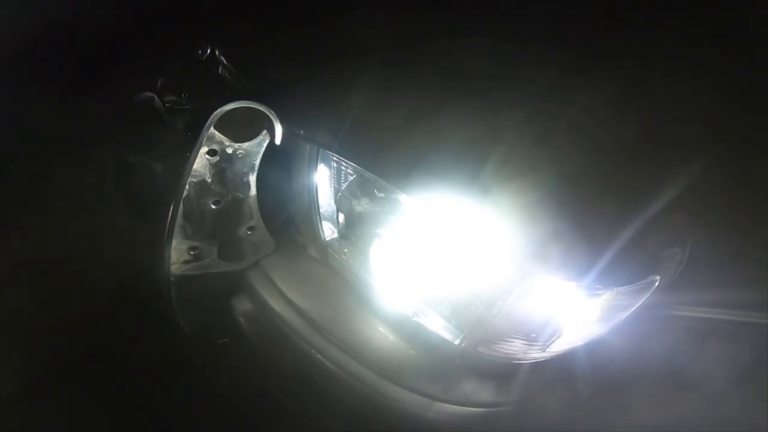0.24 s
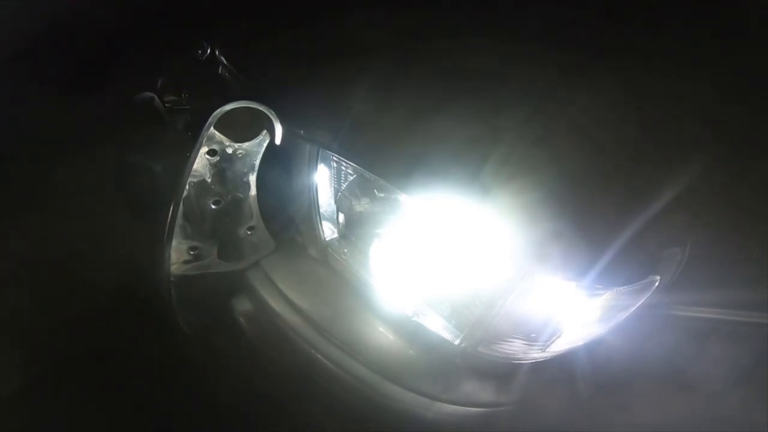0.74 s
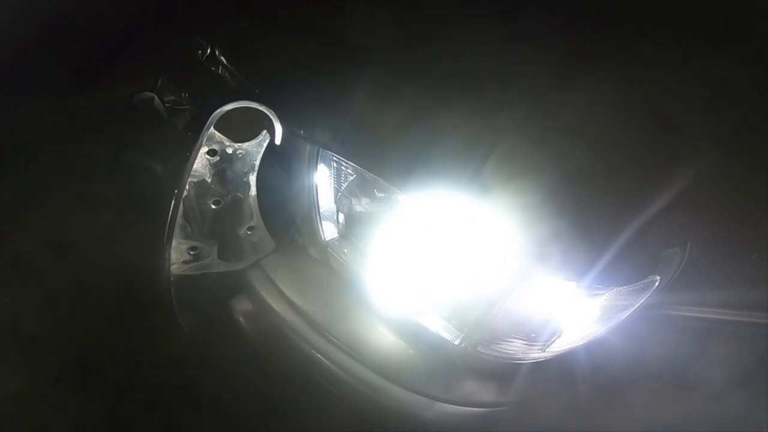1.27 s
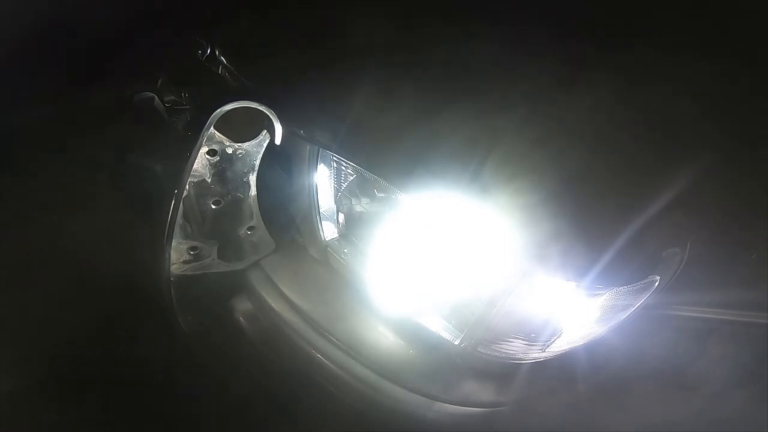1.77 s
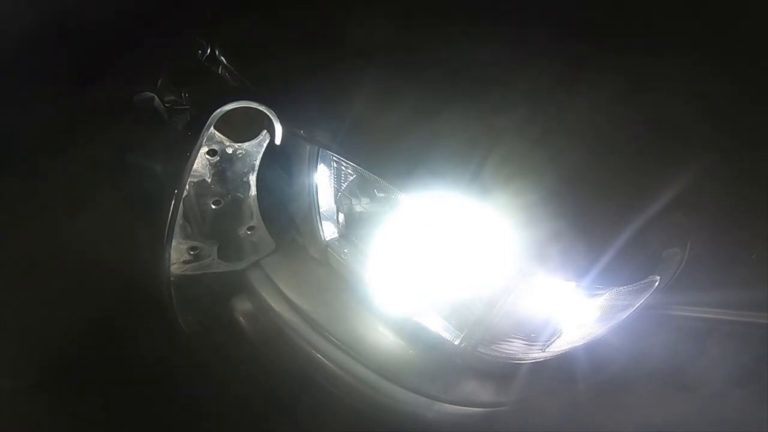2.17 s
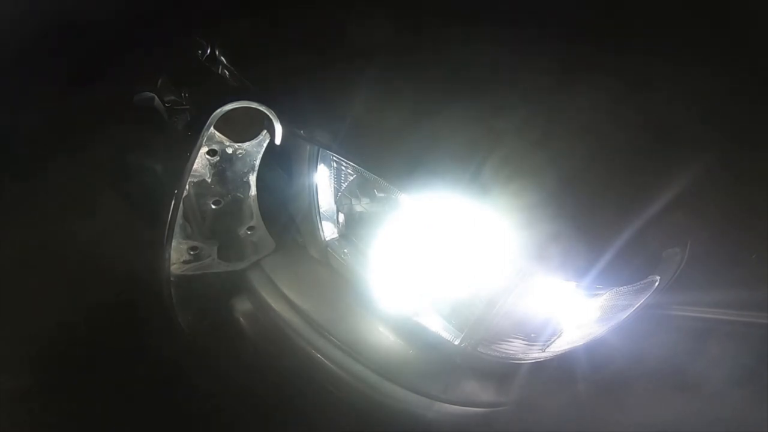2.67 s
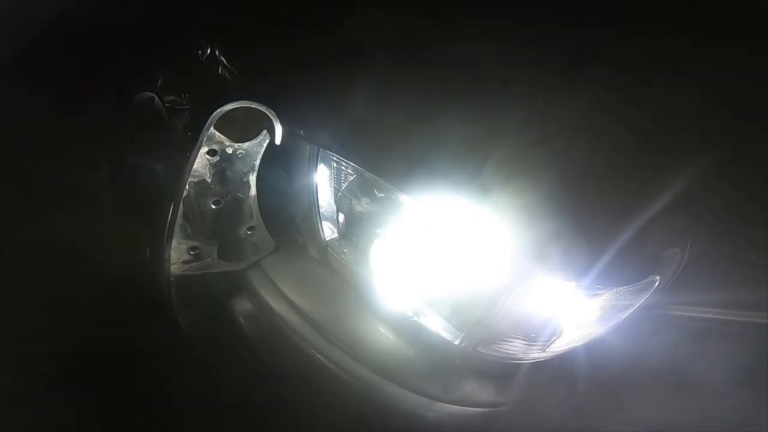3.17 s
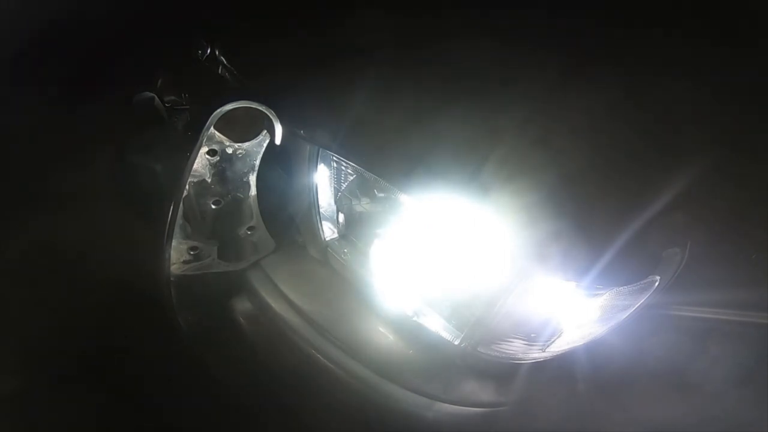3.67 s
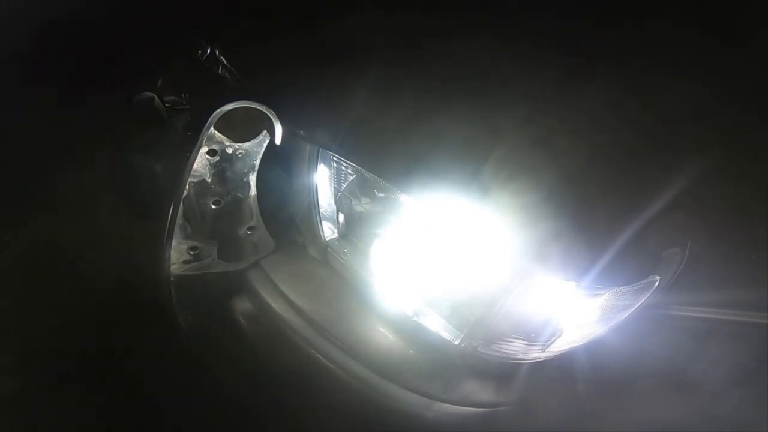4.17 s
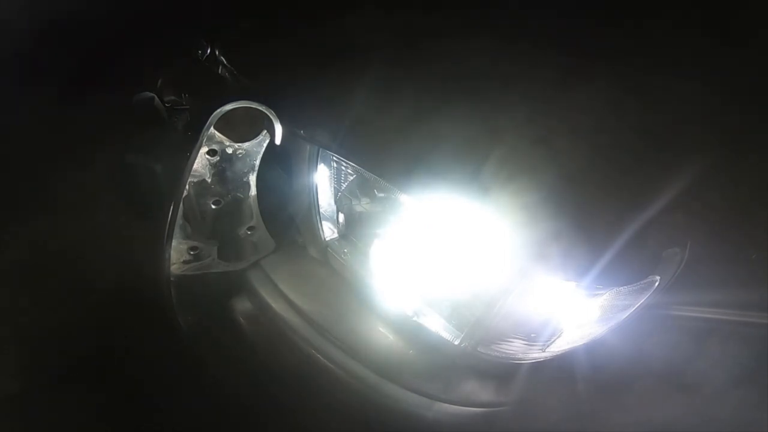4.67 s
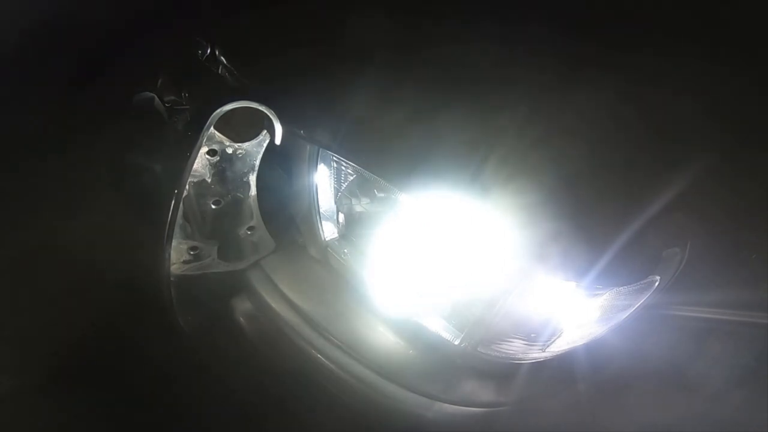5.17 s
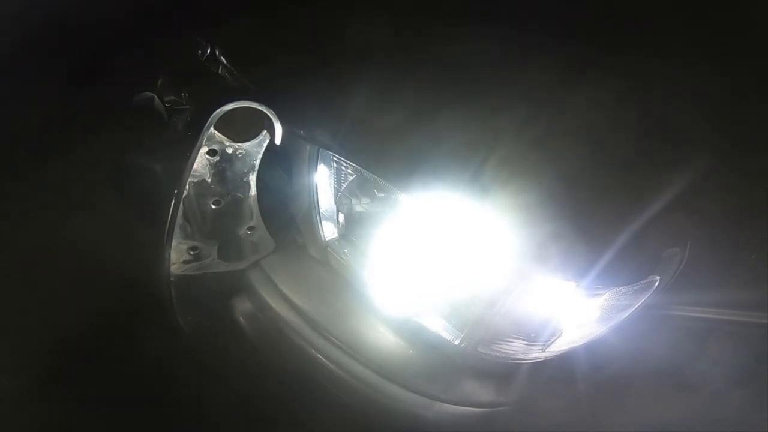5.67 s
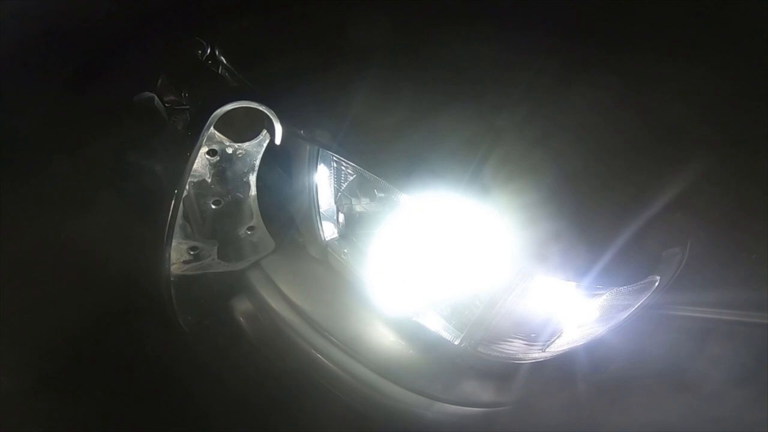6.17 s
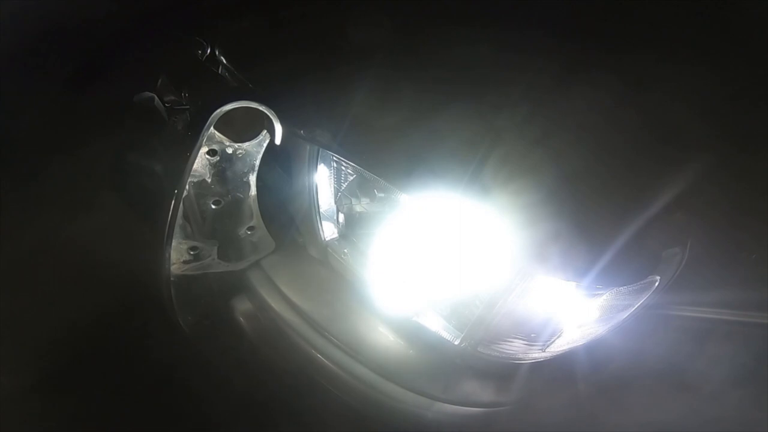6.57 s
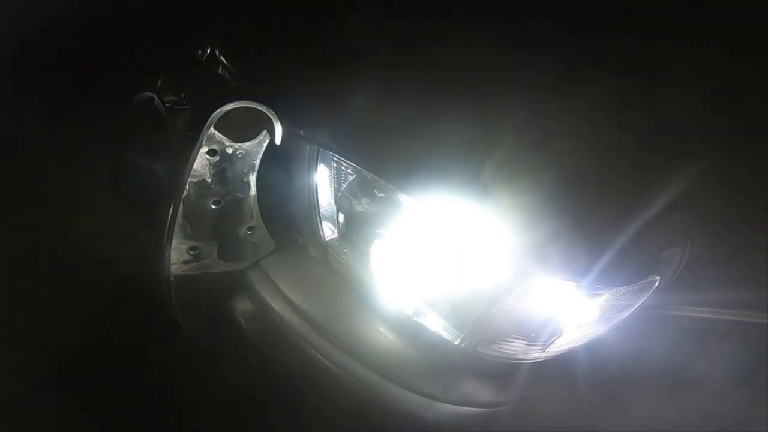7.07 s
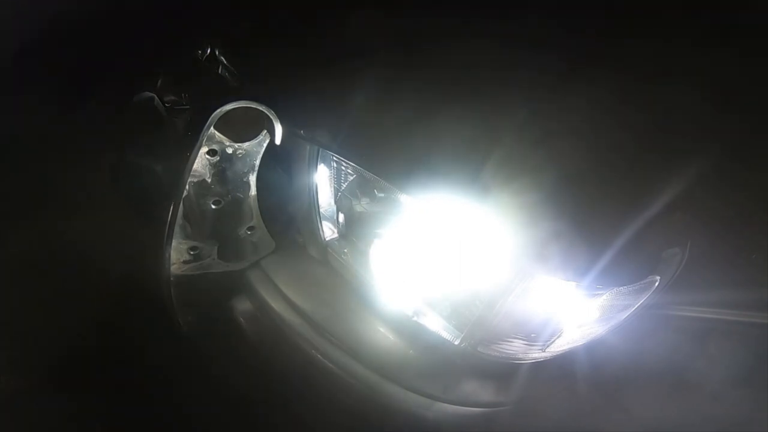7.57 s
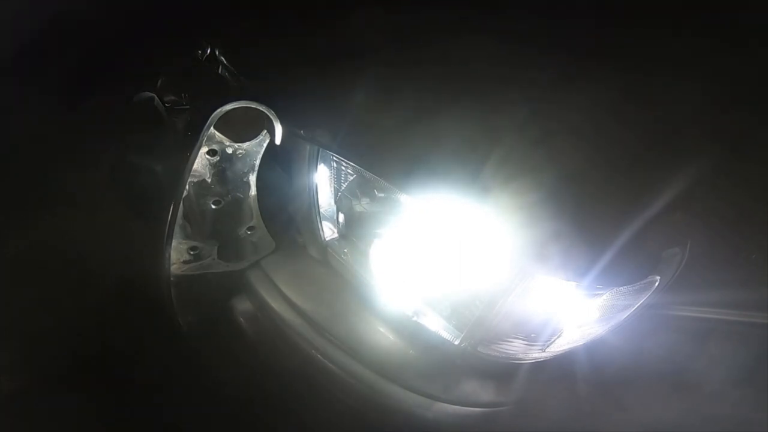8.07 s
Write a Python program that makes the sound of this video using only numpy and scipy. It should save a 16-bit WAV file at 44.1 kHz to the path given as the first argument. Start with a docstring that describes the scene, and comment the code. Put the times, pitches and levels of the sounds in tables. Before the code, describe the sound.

A quiet, low machine hum runs throughout, outdoors, over a wash of distant traffic and a deep rumble that swells slightly now and then. During the first second, something rustles softly close to the microphone, with a few tiny dry ticks, then fades away. A car headlight's shutter clacks four times, at about 1.2, 2.7, 4.7 and 7.0 seconds. These clacks are close and by far the loudest sounds. Each is sharp and dry, with a very brief ring of plastic housing and a short, hollow low note beneath. They alternate in tone: the first and third are fuller spring releases, while the second and fourth are slightly brighter snaps as the shutter pulls in. Between them come faint ticks near 1.8 and 3.9 seconds and one barely audible, thin squeak near 5.9 seconds. The hum and traffic continue until the end, a little past 8 seconds.

```python
"""A projector headlight on a parked car clacks its beam up and down twice, outdoors at night.
A solenoid pulls a shutter against its stop and a spring throws it back; the plunger scrapes on the way,
each blow rings the plastic housing, and the hollow behind the lamp answers with a short boom.
Underneath, machinery hums steadily over far traffic. Something rustles softly near the microphone
at first; a few tiny ticks and one faint squeak follow."""
import sys
import numpy as np
from scipy import signal
from scipy.fft import rfft, irfft
from scipy.io import wavfile
from scipy.ndimage import uniform_filter1d

SR = 44100
rng = np.random.default_rng(int(sys.argv[2]) if len(sys.argv) > 2 else 0)


def waveform_to_disk(signal):
    """Save audio, clipped to [-1, 1], as 16-bit WAV at the path in sys.argv[1]."""
    frames = np.transpose(np.atleast_2d(signal))
    scaled = np.clip(frames, -1, 1) * 32767
    samples = np.round(scaled).astype(np.int16)
    wavfile.write(sys.argv[1], SR, samples)


N = 367088

# tone of the night air on the right: (frequency [Hz], relative level [dB])
AIR_SPECTRUM = [(20, -21.5), (40, -7.5), (55, -3.5), (140, 1.5), (220, 0), (340, -11.5), (480, -6.5),
                (950, -14), (1350, -17.5), (1750, -23.5), (2300, -27), (2750, -36), (4400, -43),
                (6300, -39), (8000, -51), (12200, -52), (12900, -85)]
# stereo image of the air: (frequency [Hz], left minus right [dB], coherence [0-1], left lead [rad])
AIR_STEREO = [(50, -6, 0.5, -0.5), (137.6, -1.5, 0.8, 0.5), (260, -5, 0.76, 0.5), (550, -9, .95, 1.92),
              (675, -3, 1, 1.64), (1150, 1.5, 0.8, 1.7), (2290, 3.5, 1, 1.61), (3770, -0.5, 0.62, 0.5),
              (4773, -4.5, 0.2, 2), (6250, -5, 0, 2), (8200, 0, 0.4, 1.5)]
# slow swell of the far traffic: (time [s], gain [dB])
TRAFFIC_SWELL = [(0, -0.5), (0.7, 0.9), (1.6, -1), (3.5, 0.34), (5.1, -0.5), (6.1, 1), (6.95, 1),
                 (7.25, -0.7), (8.0, 0.15)]
# machine tones: (frequency [Hz], relative level [dB])
HUM_TONES = [(52, -61), (75, -53.5), (131, -51), (146, -55.5), (175, -52.5), (262.5, -67.5), (300, -67.5),
             (450, -69.5), (470, -68.5), (539.5, -69)]
# slow swell of the machinery: (time [s], gain [dB])
MACHINE_SWELL = [(0, 0), (1.2, -1.3), (2.95, 1), (4.1, -1), (5.0, -1), (5.6, -2.5), (6.1, 0.5), (6.95, 0),
                 (7.5, -0.5), (8.32, -1)]
# brief surges in the low end: (time [s], rumble boost [dB], drone boost [dB])
LOW_SURGES = [(.42, 9, 2.5), (.9, 12.5, 3), (1.58, 6, 4), (2.22, 0.5, 3), (2.86, 3.5, 4), (3.47, 9.5, 3.5),
              (4.88, 10.5, 1), (6.85, 6, 3.5)]
# soft rubs close by: (crest time [s], level [dB])
SOFT_RUBS = [(.02, -65), (.505, -52), (0.552, -53), (.795, -59), (.835, -62)]
# dry ticks close by: (time [s], level [dB], t60 [s], brightness [dB/octave])
DRY_TICKS = [(0.0497, -45, 0.014, 8), (.089, -52.5, 0.034, -4), (.159, -58, .015, 0), (0.179, -56, .016, 0),
             (.448, -57, 0.063, 2), (.795, -50, 0.025, 0), (.8302, -40, .012, 5), (1.096, -60, .04, 0),
             (1.792, -63, .08, 0), (3.866, -61.5, .062, 3), (5.911, -67, .2, 0)]
# tone of the whole rustle: (frequency [Hz], relative gain [dB])
RUSTLE_EQ = [(500, -20), (1500, -2), (2600, -1.5), (4100, -7.5), (5200, -0.5), (6100, 2.5), (7100, -15),
             (8500, -28.5), (12000, -47)]
# close sounds at the two microphone ports: (frequency [Hz], left minus right [dB], left lead [rad])
NEAR_STEREO = [(250, -7, 0), (520, -8, .3), (900, -2, 1.5), (1550, -1, 1.5), (2100, -1, 1), (3500, -2, .7),
               (4500, -6, .2), (5400, -16, .4), (6200, -11, 1.6), (7200, -4, 1.4), (10000, -2, 1.3)]
# modes of the housing: (frequency [Hz], t60 [s], level pulled in [dB], level released [dB])
HOUSING_MODES = [(468, .08, -24, 3), (506, .1, -5, -16), (880, .09, -12, -3), (1090, .06, -14, -3),
                 (1290, .09, -3, -13), (1715, .08, -8, -7), (1850, .06, -6, -13), (1940, .06, -2, -14),
                 (2060, .06, -4, -14), (2462, .08, -4, -10), (2595, .06, -7, -17), (2790, .07, -6, -9),
                 (3264, .13, -7.5, -32), (3350, .02, 1, -3), (3510, .05, -11, -2), (3770, .06, -14, -8),
                 (4150, .06, -13, -10), (4440, .07, -9, -14), (4725, .06, -4, -10), (5070, .07, -5, -14),
                 (5230, .05, -1, -10), (5328, .06, 4, -14), (5590, .05, -6, -5), (6020, .05, -3, 1),
                 (6230, .06, -9, -5), (6420, .07, -16, -8), (6690, .08, -22, -11), (7880, .07, -25, -20),
                 (9700, .04, -36, -25)]
# dense clatter between the modes: (frequency [Hz], gain pulled in [dB], gain released [dB])
CLATTER_EQ = [(100, -16.5, 2), (286, 0.5, 12), (653, -0.5, 2), (1130, 2.5, 6.5), (1930, 0.5, 2),
              (2970, -0.5, 3), (3500, 7.5, 6.5), (4297, -2, -3.5), (5620, 7, 2), (6630, -7.5, -3.5),
              (6720, -5.5, -7), (7840, -19.5, -18.5), (9900, -30, -32), (12850, -43, -45)]
# decay of the clatter: (frequency [Hz], t60 [s])
CLATTER_DECAY = [(200, 0.2), (1000, 0.15), (3000, 0.063), (6000, 0.071), (12000, 0.14)]
# shutter strokes: (stop time [s], level [dB], coil on [0 or 1], brightness [dB/octave], boom [dB])
SHUTTER_STROKES = [(1.2443, -0.2, 0, 0, -0.5), (2.6781, 0.5, 1, 0.4, 1.5), (4.7479, 0.7, 0, 0.25, 0),
                   (7.0136, 0.2, 1, 0, 1)]
# a pull breaks free, stops, bounces: (time from stop [s], level [dB], brightness [dB/octave], ring [dB])
PULL_BLOWS = [(-.0442, -22, -1.5, -10), (0, -0.5, -0.3, 3.5), (.015, -17.5, -4, -6)]
# a release knocks twice, then stops: (time from stop [s], level [dB], brightness [dB/octave], ring [dB])
RELEASE_BLOWS = [(-.0265, -33, 6.5, 4), (-.0135, -12.5, 0, 3), (0, 0, 1, 3)]


def amp(db):
    return 10 ** (np.asarray(db) / 20)


def unit(x):
    """Scales to rms 1."""
    return x / np.sqrt(np.mean(x ** 2) + 1e-20)


def decay(t, t60):
    """An envelope that falls 60 dB in t60 seconds."""
    return np.exp(-np.log(1000) * t / t60)


def read(table, hz):
    """Every column of a spectrum table, joined on a log-frequency axis."""
    table_hz, *columns = np.transpose(table)
    return [np.interp(np.log(hz + 1), np.log(table_hz + 1), column) for column in columns]


def curve(table):
    """A control curve at every sample."""
    return np.interp(np.arange(N) / SR, *np.transpose(table))


def drift(rate_hz):
    """Slow random wander of rms 1."""
    hz = np.fft.rfftfreq(N, 1 / SR)
    return unit(irfft(rfft(rng.standard_normal(N)) / (1 + (hz / rate_hz) ** 4), N))


def add(mix, start_s, sound):
    part = mix[round(start_s * SR):][:len(sound)]
    part += sound[:len(part)]


def colour(x, db):
    """Minimum-phase EQ, one gain per frequency of x: nothing rings before the hit."""
    log_gain = np.log(amp(np.concatenate([db, db[-2:0:-1]])))
    response = np.exp(np.conj(signal.hilbert(log_gain)))[:len(db)]
    return irfft(rfft(x) * response, len(x))


def low_swells(lump_db=2.5, lump_hz=7, throb_db=0.96, throb_hz=5, surge_s=0.06):
    """Gains of the rumble and the drone: both follow the machinery, surge and throb at random."""
    t, machine_db = np.arange(N) / SR, curve(MACHINE_SWELL)
    rumble_db = machine_db + lump_db * drift(lump_hz)
    drone_db = machine_db + throb_db * drift(throb_hz)
    for crest_s, rumble_boost_db, drone_boost_db in LOW_SURGES:
        surge = np.exp(-((t - crest_s) / surge_s) ** 2)
        rumble_db += rumble_boost_db * surge
        drone_db += drone_boost_db * surge
    return amp(rumble_db), amp(drone_db)


def night_air(rumble_gain, drone_gain, air_db=-46.5, rumble_hz=110, drone_hz=240):
    """The noise bed: deep rumble, machine drone and a wash of far traffic, each with its own swell."""
    hz = np.fft.rfftfreq(N, 1 / SR)
    left_db, coherence, lead = read(AIR_STEREO, hz)
    right, diffuse = rfft(rng.standard_normal((2, N)))
    left = amp(left_db) * (coherence * np.exp(1j * lead) * right + np.sqrt(1 - coherence ** 2) * diffuse)
    bed = np.array([left, right]) * unit(amp(read(AIR_SPECTRUM, hz)[0]))
    deep, low = (1 / (1 + (hz / edge) ** 6) for edge in (rumble_hz, drone_hz))  # crossover low-passes
    rumble = irfft(bed * deep, N) * rumble_gain
    drone = irfft(bed * (low - deep), N) * drone_gain
    traffic = irfft(bed * (1 - low), N) * amp(curve(TRAFFIC_SWELL))
    return amp(air_db) * (rumble + drone + traffic)


def machine_hum(rumble_gain, drone_gain, waver_hz=0.893, flutter_db=3, left_db=-4, hum_db=-1):
    """Steady machine tones, each wavering a little; the deepest ones swell with the rumble."""
    out = np.zeros(N)
    for hz, db in HUM_TONES:
        turns = np.cumsum(hz + waver_hz * drift(rate_hz=2)) / SR + rng.random()
        swell = rumble_gain if hz < 110 else drone_gain
        gain = amp(hum_db + db + flutter_db * drift(rate_hz=6)) * swell
        out += np.sqrt(2) * gain * np.sin(2 * np.pi * turns)
    return np.array([amp(left_db) * out, out])


def squeak(start_s=5.905, length_s=0.075, hz=4860, squeak_db=-72, jitter_hz=80):
    """One faint, thin, unsteady squeak."""
    envelope = np.zeros(N)
    add(envelope, start_s, amp(squeak_db) * np.hanning(round(length_s * SR)))
    pitch_hz = hz + jitter_hz * drift(rate_hz=250)
    return envelope * np.sin(2 * np.pi * np.cumsum(pitch_hz) / SR)


def rustle(hiss_db=-69, hold_s=0.97, fade_db_per_s=16.5, rise_s=0.01, fall_s=0.022, grain_db=2):
    """A soft hiss that holds and dies away, a few grainy rubs and dry ticks."""
    t, size = np.arange(N) / SR, 8192
    envelope = amp(hiss_db - fade_db_per_s * np.maximum(t - hold_s, 0))
    for crest_s, db in SOFT_RUBS:
        envelope += amp(db) * np.exp(-np.maximum((crest_s - t) / rise_s, (t - crest_s) / fall_s))
    out = envelope * amp(grain_db * drift(rate_hz=200)) * rng.standard_normal(N)
    octaves = np.log2(np.clip(np.fft.rfftfreq(size, 1 / SR), 1000, 8000) / 4000)
    for start_s, db, t60, tilt in DRY_TICKS:
        tick = rng.standard_normal(size) * decay(t[:size], t60)
        add(out, start_s, colour(tick, db + tilt * octaves))
    eq_db = read(RUSTLE_EQ, np.fft.rfftfreq(N, 1 / SR))[0]
    return irfft(rfft(out) * unit(amp(eq_db)), N)


def plunger_scrape(size=2048, pull_db=-45, return_db=-35, pull_rise_s=0.008, return_rise_s=0.0086):
    """The plunger scrapes along its bore, louder as it gathers speed; the spring return is rougher."""
    t, out = np.arange(size) / SR, np.zeros(N)
    pulled_db, released_db = read(CLATTER_EQ, np.fft.rfftfreq(size, 1 / SR))
    for stop_s, db, coil_on, *_ in SHUTTER_STROKES:
        eq_db = pulled_db + pull_db if coil_on else released_db + return_db
        rise = np.exp((t - t[-1]) / (pull_rise_s if coil_on else return_rise_s))
        scrape = colour(rng.standard_normal(size), eq_db)
        add(out, stop_s - t[-1], amp(db) * scrape * rise)
    return out


def hollow_boom(size=8192, boom_db=-34.5, pulled_hz=256, released_hz=262, crest_s=0.025, steepness=4.2):
    """The hollow behind the lamp takes up the blow slowly and answers with a short low note."""
    t, out = np.arange(size) / SR, np.zeros(N)
    swell = (t / crest_s * np.exp(1 - t / crest_s)) ** steepness
    for stop_s, db, coil_on, _, hollow_db in SHUTTER_STROKES:
        note = np.sin(2 * np.pi * (pulled_hz if coil_on else released_hz) * t)
        add(out, stop_s, amp(boom_db + db + hollow_db) * swell * note)
    return out


def plastic_clatter(noise, coil_on, hold_s=0.00085, crack_db=-2, echo_db=-27):
    """Countless plastic modes: a first crack, a fast-dying body and a faint echo round the engine bay."""
    hz, t, bands = signal.stft(noise, SR, nperseg=128)
    after_hold = np.maximum(t - hold_s, 0)
    crack = amp(crack_db) * decay(after_hold, t60=0.01)
    body = decay(after_hold, read(CLATTER_DECAY, hz)[0][:, None])
    echo = amp(echo_db) * decay(t, t60=0.22)
    envelope = np.sqrt(crack ** 2 + body ** 2 + echo ** 2)
    burst = signal.istft(bands * envelope, SR, nperseg=128)[1][:len(noise)]
    # a hard blow feeds all bands alike, so the housing alone sets the broad colour
    power = uniform_filter1d(abs(rfft(burst)) ** 2, size=90)
    uneven_db = 10 * np.log10(power / power.mean() + 1e-9)
    pulled_db, released_db = read(CLATTER_EQ, np.fft.rfftfreq(len(noise), 1 / SR))
    return colour(burst, (pulled_db if coil_on else released_db) - uneven_db)


def shutter_clacks(size=16384, clatter_db=-22, ring_db=-30, alike=0.7, attack_s=0.001, bloom_s=0.00036):
    """Each blow of the shutter, three to a stroke, rings the same housing a little differently."""
    t, out = np.arange(size) / SR, np.zeros(N)
    mode_hz, t60, pulled_db, released_db = np.transpose(HOUSING_MODES)[:, :, None]
    tones = np.sin(2 * np.pi * (mode_hz * t + rng.random(mode_hz.shape)))
    modes = tones * decay(t, t60) * (1 - np.exp(-t / bloom_s))
    attack = 1 - np.exp(-t / attack_s)
    octaves = np.log2(np.clip(np.fft.rfftfreq(size, 1 / SR), 200, 9000) / 3000)
    shared_noise = rng.standard_normal(size)
    for stop_s, stroke_db, coil_on, stroke_tilt, _ in SHUTTER_STROKES:
        ring = (amp(pulled_db if coil_on else released_db) * modes).sum(0)
        for lag_s, blow_db, blow_tilt, modes_db in PULL_BLOWS if coil_on else RELEASE_BLOWS:
            noise = alike * shared_noise + np.sqrt(1 - alike ** 2) * rng.standard_normal(size)
            blow = amp(clatter_db) * plastic_clatter(noise, coil_on) + amp(ring_db + modes_db) * ring
            clack = colour(blow * attack, (stroke_tilt + blow_tilt) * octaves)
            add(out, stop_s + lag_s, amp(stroke_db + blow_db) * clack)
    return out


def place_near(x, size=256, scatter_db=-14, scatter_hz=3000):
    """A near source meets each port with its own colour and phase; close surfaces scatter the treble."""
    hz = np.fft.rfftfreq(N, 1 / SR)
    left_db, lead = read(NEAR_STEREO, hz)
    echoes = rng.standard_normal(size) * np.linspace(1, 0, size)
    treble = hz ** 2 / (hz ** 2 + scatter_hz ** 2)
    scatter = amp(scatter_db) * rfft(echoes / np.linalg.norm(echoes), N) * treble
    left = irfft(rfft(x) * amp(left_db) * (np.exp(1j * lead) + scatter), N)
    return np.array([left, x])


def scene():
    """The lamp and the small noises up front, over the hum and the night air."""
    near = shutter_clacks() + hollow_boom() + plunger_scrape() + rustle() + squeak()
    rumble_gain, drone_gain = low_swells()
    return place_near(near) + machine_hum(rumble_gain, drone_gain) + night_air(rumble_gain, drone_gain)


def record(dry):
    """A steep high cut takes off the very top."""
    high_cut = signal.firwin(511, cutoff=14500, window=("kaiser", 9), fs=SR)
    return signal.oaconvolve(dry, high_cut[None], "same")


dry = scene()
out = record(dry)
waveform_to_disk(out)
```